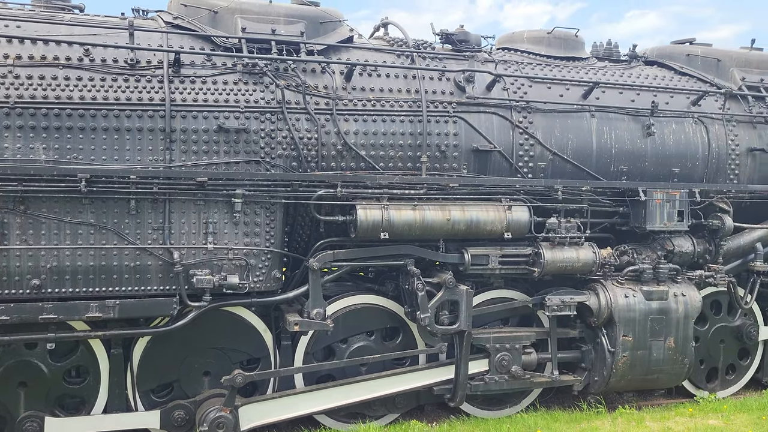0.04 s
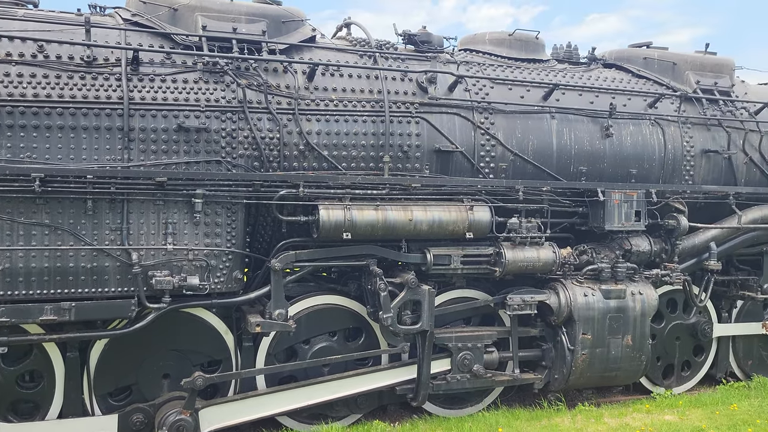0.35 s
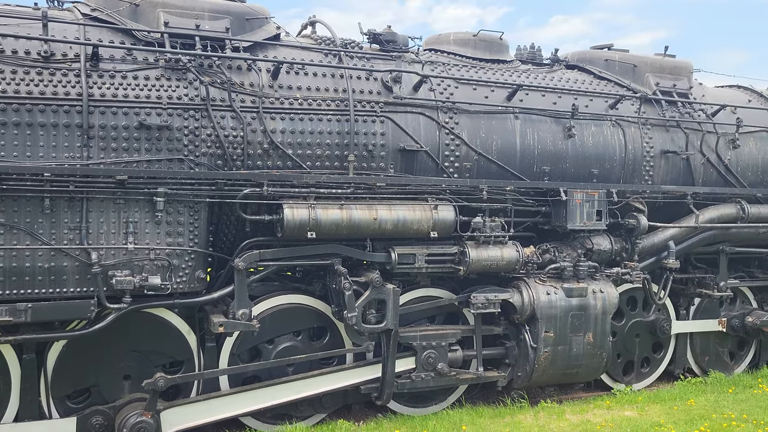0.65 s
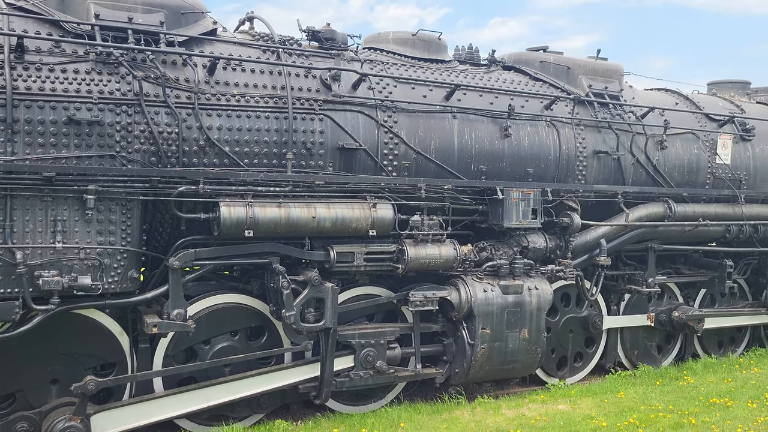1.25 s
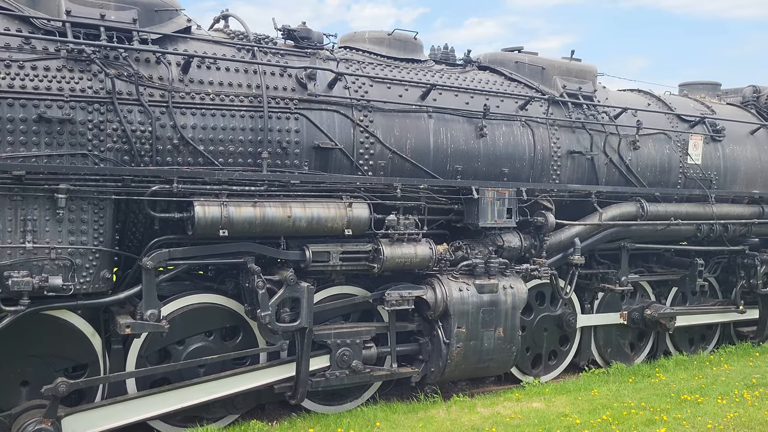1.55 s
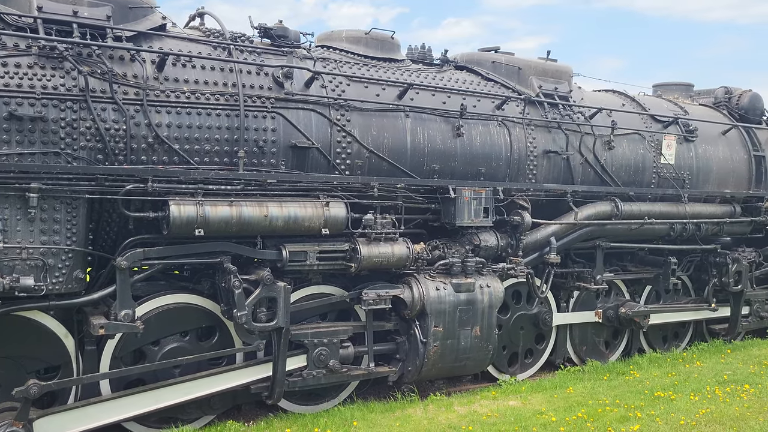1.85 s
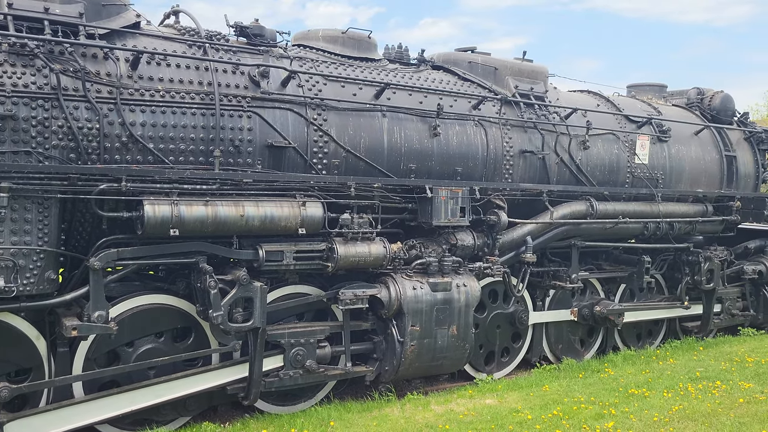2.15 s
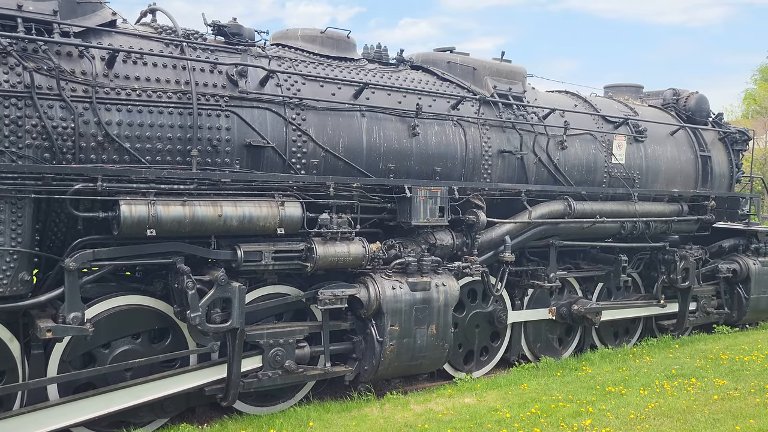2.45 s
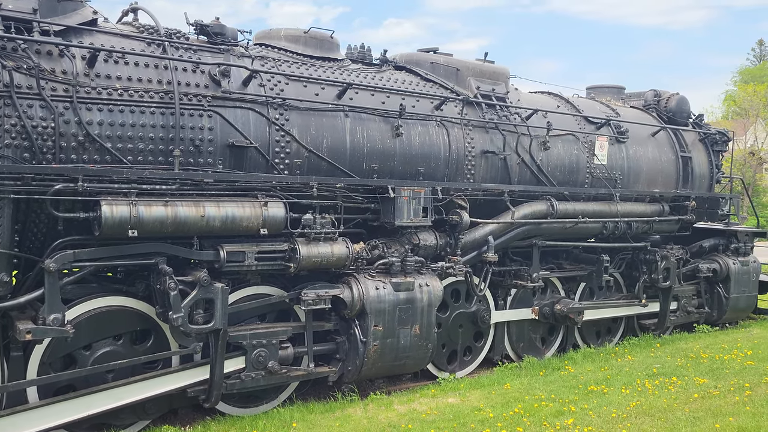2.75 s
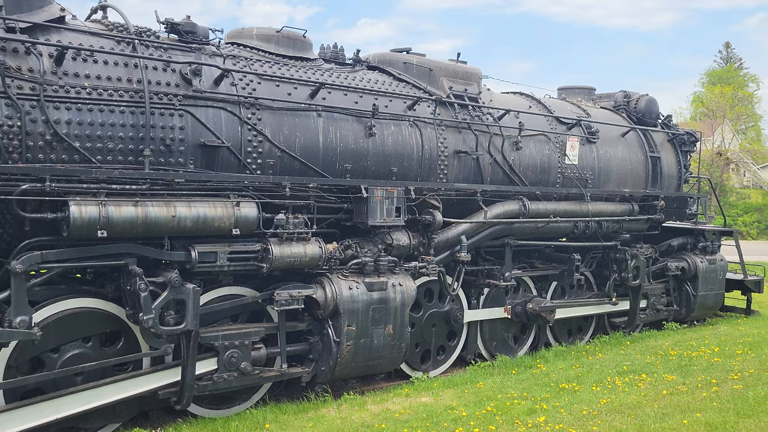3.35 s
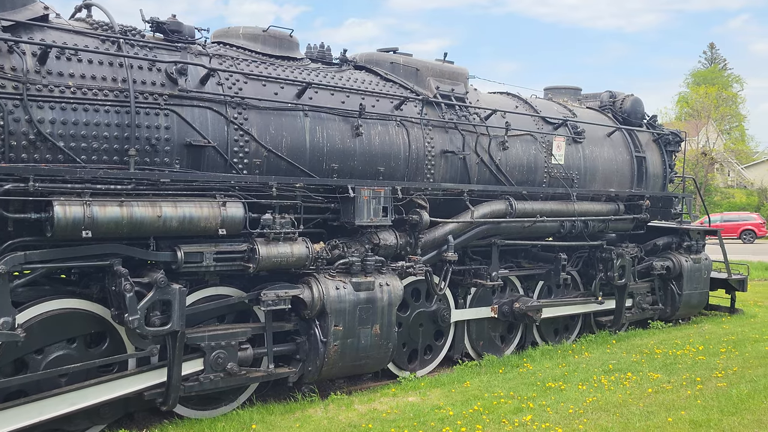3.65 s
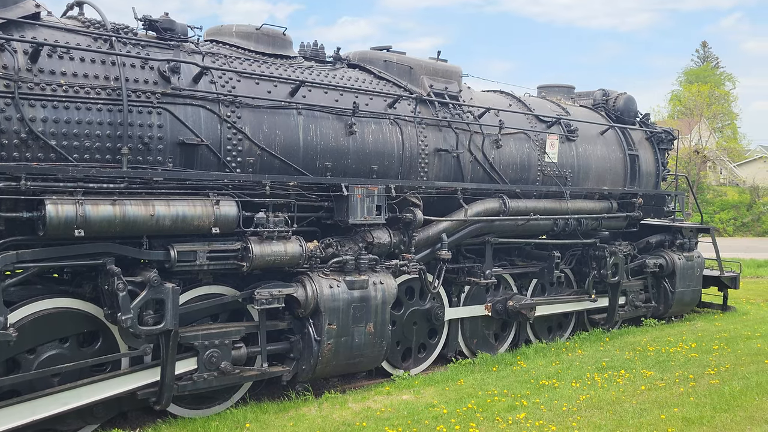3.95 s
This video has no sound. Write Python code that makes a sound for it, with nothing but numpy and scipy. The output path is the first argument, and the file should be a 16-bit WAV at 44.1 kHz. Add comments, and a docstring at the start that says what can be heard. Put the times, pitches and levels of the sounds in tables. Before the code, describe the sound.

Wind thumps on the microphone outdoors as cloth rustles and cracks, slackening after a second. Steady road rumble and a low hum run underneath; later a distant bird chirps and a lighter breeze rumbles on the left.

```python
"""Outdoors beside a parked locomotive: road traffic rumbles under one steady low hum throughout.
At the start a gust buffets the microphone and sets cloth, probably a flag, fluttering and snapping:
creases click, folds rasp, cracks ring briefly. After about a second it settles into soft slack flaps.
From 2 s a small bird chirps far off and a faint leafy sizzle passes; near 3 s a blurred trill joins
and a lighter breeze catches the left microphone port."""
import sys
import numpy as np
from scipy import signal
from scipy.fft import rfft, irfft
from scipy.io import wavfile

SR = 44100
rng = np.random.default_rng(int(sys.argv[2]) if len(sys.argv) > 2 else 0)


def store_wav(level_fs):
    """Save 16-bit WAV to argv[1]."""
    pcm = np.round(np.clip(np.atleast_2d(level_fs), -1, 1) * 32767)
    wavfile.write(sys.argv[1], SR, pcm.T.astype(np.int16))


N = 176400
TIME, HZ = np.arange(N) / SR, np.fft.rfftfreq(N, 1 / SR)
SNAP_RISE_S = .0006
# cloth at the two microphone ports: freq_hz, correlation
CLOTH_CORRELATION = [(200, 0.6), (400, 1), (700, .5), (1250, -0.72), (1750, -0.19), (2400, 0.79),
                     (3200, -0.0056), (4400, -0.15), (8000, 0.49)]


def flag():
    """Cloth rustles with the gust; each whip gives a crease burst, a high crack and a brief ring."""
    # rustle envelope: time_s, level_db, treble_db
    flutter = [(0, -42, 14.5), (.17, -32.5, 7.5), (.27, -34.5, 10.5), (.44, -38, 9), (.53, -36.5, 5),
               (.7, -37, 5), (.85, -31, 0.5), (1.0, -33.5, 1.5), (1.12, -35.5, -4.5), (1.24, -39.5, -3),
               (1.36, -55, -14), (1.6, -44.5, -28.5), (1.85, -46, -24), (2.3, -53.5, 11.5), (4, -51.5, 6)]
    # whips: start_s, level_db, decay_s, treble_db, ring_offset_db
    snaps = [(.002, -31, 0.01, 18.5, -23), (0.028, -43.5, .012, 26, -23), (0.095, -35.5, 0.0046, 14.5, -20),
             (0.236, -28.5, 0.034, 11, -19), (0.318, -30, 0.017, 8, -8), (0.335, -29.5, 0.012, 11, -20),
             (0.413, -29, 0.037, 8, -11), (0.607, -28.5, 0.0064, -12, -27), (0.708, -29, 0.0053, -13, -14),
             (.764, -29, 0.009, 3, -4.5), (0.809, -27, 0.018, 3.5, 0.5), (0.906, -23, 0.0091, 1, -7),
             (1.008, -27, 0.028, 3.5, 1.5), (1.097, -28.5, 0.017, 8, 3), (1.146, -37, 0.0051, -3, 7),
             (1.179, -22, 0.011, -2.5, 0.5), (1.234, -40, 0.005, -4, 5), (1.521, -34, 0.016, -22, -23),
             (1.581, -38, 0.0059, -12, -13), (1.616, -37, 0.016, -20, -2.5), (2.514, -51.5, 0.0054, 2, 8),
             (2.709, -42.5, 0.009, 5, -4.5)]
    # ring modes: pitch_hz, gain_db, decay_s
    modes = [(2820, 1, 0.0038), (3550, -15, 0.015), (2310, -13.5, 0.0043)]
    crack_offset_db, crack_decay_s = -41, .008
    body, treble = cloth(low_cut_hz=61)
    bright = amp(along(flutter, column=2))
    out = (body + treble * bright) * amp(along(flutter) + .86 * drift(rate_hz=32))
    body, treble = cloth(low_cut_hz=465)
    crack = bright * unit(colour(noise(), highpass(hz=4500, order=4)))
    tunings = 1 + .01 * rng.uniform(-.62, 1, len(snaps))
    t = np.arange(SR // 10) / SR
    rise = np.minimum(t / SNAP_RISE_S, 1)
    for (s, db, decay_s, treble_db, ring_db), tuning in zip(snaps, tunings):
        out += amp(db) * burst(s, decay_s) * (body + amp(treble_db) * treble)
        out += amp(db + crack_offset_db + treble_db) * burst(s, crack_decay_s) * crack
        ring = sum(amp(mode_db) * np.exp(-t / fall_s) * np.sin(2 * np.pi * hz * tuning * t)
                   for hz, mode_db, fall_s in modes)
        add(out, s, amp(db + ring_db) * rise * ring * stereo_db(-1.5, 3))
    return out


def cloth(low_cut_hz):
    """Crease noise with a ground echo and resonances that come and go, split into body and treble."""
    # crease spectrum: freq_hz, gain_db
    spectrum = [(100, 11.5), (300, 2), (500, -5), (750, 12.5), (1100, 5.5), (1600, 0), (2100, -3.5),
                (2800, -0.5), (4000, -8), (5500, -14), (7600, -22), (8400, -32), (9500, -59),
                (13000, -39.5), (16000, -71.5)]
    # balance: freq_hz, left_minus_right_db
    pan = [(200, -1), (450, -7), (720, 0), (1100, 6), (1600, 2.5), (2000, 1.5), (2350, -5), (3300, -2),
           (4400, -4.5), (8000, -13), (12000, -4.5)]
    # cloth resonances: centre_hz, width_hz, gain_db
    peaks = [(1765, 330, -1.5), (2210, 53, -3.5), (3000, 120, -6.5), (3700, 110, -11.5)]
    echo_gain, echo_s, peak_waver_db = .2, .001823, 6
    ground = 1 + echo_gain * np.exp(-2j * np.pi * HZ * echo_s)
    clicks = ports(creases(), CLOTH_CORRELATION, pan)
    rustle = colour(clicks, amp(across(spectrum)) * ground * highpass(low_cut_hz, order=2))
    resonance = sum(colour(rustle, bell(hz, width_hz)) * amp(db + peak_waver_db * drift(rate_hz=38))
                    for hz, width_hz, db in peaks)
    rustle = unit(rustle + resonance)
    treble = colour(rustle, highpass(hz=4360, order=4))
    return rustle - treble, treble


def creases(clicks_per_s=4200, spread_db=2.2):
    """Crumpling cloth: dense tiny clicks of uneven size."""
    size = amp(spread_db * np.minimum(rng.exponential(1, (2, N)), 4))
    return size * rng.choice([-1, 1], (2, N)) * (rng.random((2, N)) < clicks_per_s / SR)


def rasps(slips_per_s=450, width_hz=190):
    """Folds stick and slip: uneven pulses through one narrow resonance."""
    # rubs of fold on fold: start_s, length_s, level_db, resonance_hz
    rubs = [(0.234, 0.056, -36.5, 2720), (0.32, 0.091, -38.5, 2600), (0.415, .06, -35.5, 2600),
            (0.574, .18, -43.5, 2960), (.775, 0.13, -37, 2200), (0.95, 0.054, -36.5, 2240),
            (0.926, .13, -41, 1700)]
    out = np.zeros((2, N))
    for s, length_s, db, hz in rubs:
        slip_count = np.floor(np.cumsum(slips_per_s * np.exp(drift(rate_hz=150))) / SR)
        grit = np.diff(slip_count, prepend=0) * noise() * swell(s, length_s)
        rasp = colour(grit, 1 / (1 + 2j * (HZ - hz) / width_hz) ** 2)
        out += amp(db) * unit(rasp) * np.sqrt(length_s * SR / N)  # rms over the rub's length
    return out * stereo_db(-5, 0)


def swish(level_db=-63):
    """Sliding cloth: one airy swell of high crease noise."""
    hiss = unit(colour(creases(), gaussian(hz=12500, width_hz=1500)))
    return amp(level_db) * hiss * swell(start_s=.14, length_s=.16)


def flaps(knock_offset_db=4, knock_decay_s=.006):
    """Slack cloth knocks: a puff of crease noise over a hollow, quickly damped note."""
    # flaps: start_s, level_db, pitch_hz
    hits = [(1.308, -37.5, 680), (1.584, -36.5, 627), (1.694, -34, 653), (1.921, -33, 763),
            (2.116, -37.5, 890), (2.385, -38.5, 770), (2.513, -39.5, 730), (2.582, -38.5, 768),
            (3.159, -48, 780)]
    # puff spectrum: freq_hz, gain_db
    spectrum = [(150, -53), (450, -10.5), (780, 14), (1200, -0.5), (2000, -5), (3500, -7.5), (7500, -37),
                (10000, -51.5)]
    clicks = ports(creases(), CLOTH_CORRELATION, pan=[(500, 2.2), (4000, 1)])
    puff = unit(colour(clicks, amp(across(spectrum))))
    out, t = np.zeros((2, N)), np.arange(SR // 10) / SR
    for s, db, hz in hits:
        out += amp(db) * puff * burst(s, decay_s=.012)
        knock = np.exp(-t / knock_decay_s) * np.sin(2 * np.pi * hz * t)
        add(out, s, amp(db + knock_offset_db) * knock)
    return out


def gust():
    """Wind buffets the microphone and dies away."""
    # gust envelope: time_s, level_db
    envelope = [(0, -21.5), (.035, -19), (.075, -26), (.115, -21.5), (.2, -28.5), (.26, -23.5),
                (.42, -29.5), (.5, -34), (.95, -32.5), (1.25, -37), (1.7, -64.5)]
    # buffet spectrum: freq_hz, gain_db
    spectrum = [(15, -28.5), (30, -5.5), (50, -4.5), (110, 1), (220, -9), (400, -16.5), (750, -19.5),
                (1300, -40), (4000, -36), (9500, -69.5), (13000, -65), (16000, -70.5)]
    # wind at the two ports: freq_hz, correlation
    correlation = [(60, .65), (130, .85), (300, .92), (900, .7)]
    # balance: freq_hz, left_minus_right_db
    pan = [(60, 2.3), (200, 2.4), (600, 4.5)]
    buffet = unit(colour(ports(noise(), correlation, pan), amp(across(spectrum))))
    return buffet * amp(along(envelope) + drift(rate_hz=88))


def thumps(length_s=.04):
    """Single eddies strike the microphone, each a short low push."""
    # eddies: centre_s, peak_db, pitch_hz
    eddies = [(0.042, -15, 61.3), (0.119, -14, 57), (0.265, -20, 189), (0.307, -15.5, 99),
              (0.414, -19.5, 197)]
    out, t = np.zeros(N), np.arange(0, length_s, 1 / SR)
    for (s, db, hz), turn in zip(eddies, rng.random(len(eddies))):
        push = np.hanning(len(t)) * np.sin(2 * np.pi * (hz * t + turn))
        add(out, s - length_s / 2, amp(db) * push)
    return out * stereo_db(1, -1)


def breeze():
    """Lighter wind rumbles mostly on the left port."""
    # breeze envelope: time_s, level_db
    envelope = [(0, -54.5), (2.8, -36), (3.05, -24), (3.25, -31), (3.47, -18.5), (3.7, -34.5), (4, -34)]
    band = bell(hz=63.4, width_hz=42) ** 1.3 * highpass(hz=34, order=6)
    rumble = unit(colour(noise(), band))
    return rumble * amp(along(envelope) + 2 * drift(rate_hz=13)) * stereo_db(0, -12)


def hum(pitch_hz=165.65, level_db=-27.5):
    """One steady, barely wavering machine tone."""
    # slow swell: time_s, offset_db
    envelope = [(0, -2.6), (1.2, -1.9), (2.5, -0.04), (4, -0.5)]
    waver_hz, waver_db, right_lead_rad = .05, .3, .4
    turns = np.cumsum(pitch_hz + waver_hz * drift(rate_hz=3.7)) / SR
    rms = amp(level_db + waver_db * drift(rate_hz=1.7) + along(envelope))
    return np.sqrt(2) * rms * np.sin(2 * np.pi * turns + np.array([[0], [right_lead_rad]]))


def traffic():
    """Lumpy engine rumble and smoother tyre noise from the road."""
    # engine spectrum: freq_hz, gain_db
    engine_spectrum = [(15, -37), (25, -18.5), (33, -13), (48, 2.5), (65, 4), (82, 3.5), (100, -0.5),
                       (140, -4.5), (200, -11.5), (260, -16.5), (400, -32), (900, -65.5)]
    # engine envelope: time_s, level_db
    engine_envelope = [(0, -27), (1.2, -27), (1.6, -29.5), (3.0, -28.5), (3.5, -29.5), (4, -30.5)]
    # tyre spectrum: freq_hz, gain_db
    tyre_spectrum = [(210, -4), (320, 3.5), (400, -2.5), (520, 0), (630, 0), (742, 0), (974, -6.5),
                     (1040, -4), (1380, -7), (2170, -12.5), (2890, -20), (3980, -21.5), (5480, -28),
                     (7920, -32.5), (9440, -78), (14100, -50.5), (16000, -63)]
    # tyre envelope: time_s, level_db
    tyre_envelope = [(0, -43), (1.4, -40.5), (2, -42), (4, -43)]
    # road at the two ports: freq_hz, correlation
    correlation = [(40, .9), (80, .95), (130, .96), (290, .93), (640, .85), (1400, .45), (3000, .3),
                   (7000, .1)]
    # phase between ports: freq_hz, left_lead_rad
    phase = [(60, -.1), (200, -.25), (400, -.4), (780, -.8), (1460, -3), (2150, -6), (3000, -6.4)]
    # balance: freq_hz, left_minus_right_db
    pan = [(60, 1.5), (110, -1), (200, 1), (380, 0), (700, 2), (1290, 2.5), (1900, 1), (2500, -6.5),
           (3300, -1), (4400, -7), (6000, -7), (8120, -8.5), (11000, 0.5)]
    air = ports(noise(), correlation, pan)
    air = colour(air, np.exp(1j * across(phase) * np.array([[.5], [-.5]])))
    engines = unit(colour(air, amp(across(engine_spectrum))))
    engines *= amp(along(engine_envelope) + drift(rate_hz=8))
    tyres = unit(colour(air, amp(across(tyre_spectrum)) * highpass(hz=330, order=4)))
    tyres *= amp(along(tyre_envelope) + .5 * drift(rate_hz=7.2))
    return engines + tyres


def bird():
    """Each chirp is two falling whistles: the upper echoes once, the lower starts later and steeper."""
    # chirps: start_s, level_db, start_pitch_hz
    chirps = [(2.014, -55, 4150), (3.373, -51.5, 4680), (3.503, -50, 4450), (3.641, -51.5, 4380)]
    high_s, fall_hz_per_s, waver_hz = .05, 18000, 90
    low_s, low_lag_s, low_ratio, low_floor_hz, glide_s = .038, .01, .93, 2400, .021
    echo_s, echo_db = .024, -12.5
    out = np.zeros(N)
    t_high, t_low = np.arange(0, high_s, 1 / SR), np.arange(0, low_s, 1 / SR)
    for s, db, hz in chirps:
        high_hz = hz - fall_hz_per_s * t_high + waver_hz * drift(rate_hz=440)[:len(t_high)]
        low_hz = low_floor_hz + (hz * low_ratio - low_floor_hz) * np.exp(-t_low / glide_s)
        high, low = [amp(db) * signal.windows.tukey(len(f), .6) * np.sin(2 * np.pi * np.cumsum(f) / SR)
                     for f in (high_hz, low_hz)]
        add(out, s, high)
        add(out, s + low_lag_s, low)
        add(out, s + echo_s, high * amp(echo_db))
    return out * stereo_db(-1.5, 1.5)


def trees():
    """Two far noise bands: a blurred bird trill and a faint high sizzle, perhaps leaves."""
    # trill envelope: time_s, level_db
    trill_envelope = [(2.85, -78), (3.1, -58), (3.3, -56), (3.45, -52), (3.6, -66), (3.75, -58), (4, -66)]
    # sizzle envelope: time_s, level_db
    leaf_envelope = [(1.9, -78), (2.25, -70), (2.45, -58.5), (2.9, -71), (4, -71)]
    trill = unit(colour(noise(), bell(hz=2770, width_hz=130))) * amp(along(trill_envelope))
    leaves = unit(colour(noise(), gaussian(hz=5250, width_hz=860))) * amp(along(leaf_envelope))
    return (trill + leaves) * stereo_db(-3, 1.5)


def reflections(x, t60_s=.45, taps_per_s=2000, gap_s=.008, low_cut_hz=750):
    """Short sparse echoes off the locomotive's side, thin in the bass."""
    t = np.arange(SR // 2) / SR
    taps = rng.standard_normal((2, len(t))) * (rng.random((2, len(t))) < taps_per_s / SR)
    taps *= (t > gap_s) * amp(-60 * t / t60_s)
    taps = signal.sosfilt(signal.butter(2, low_cut_hz, "highpass", fs=SR, output="sos"), taps)
    taps /= np.linalg.norm(taps, axis=1, keepdims=True)
    return signal.fftconvolve(x, taps, axes=1)[:, :N]


def amp(db):
    """Decibels to gain."""
    return 10 ** (np.asarray(db) / 20)


def stereo_db(left, right):
    """Gain per channel."""
    return amp([[left], [right]])


def unit(x):
    """Scales to rms 1."""
    return x / np.sqrt(np.mean(x ** 2) + 1e-20)


def noise():
    """Two unrelated white noises."""
    return rng.standard_normal((2, N))


def drift(rate_hz):
    """Smooth random movement of rms 1."""
    return unit(colour(rng.standard_normal(N), 1 / (1 + (HZ / rate_hz) ** 4)))


def across(points):
    """Reads a table over log frequency."""
    hz, value = np.transpose(points)
    return np.interp(np.log(HZ + 1), np.log(hz + 1), value)


def along(points, column=1):
    """Reads a table column over time."""
    rows = np.array(points)
    return np.interp(TIME, rows[:, 0], rows[:, column])


def add(mix, start_s, sound):
    """Mixes a sound in."""
    part = mix[..., max(round(start_s * SR), 0):][..., :sound.shape[-1]]
    part += sound[..., :part.shape[-1]]


def burst(start_s, decay_s):
    """Quick rise, exponential fall."""
    out, t = np.zeros(N), np.arange(SR // 5) / SR
    fall = np.exp(-np.maximum(t - SNAP_RISE_S, 0) / decay_s)
    add(out, start_s, np.minimum(t / SNAP_RISE_S, 1) * fall)
    return out


def swell(start_s, length_s):
    """Rounded rise and fall."""
    out = np.zeros(N)
    add(out, start_s, signal.windows.tukey(round(length_s * SR), .5))
    return out


def colour(x, gain):
    """Filters by a gain per frequency."""
    return irfft(rfft(x) * gain, N)


def bell(hz, width_hz):
    """Gain of one resonance."""
    return 1 / (1 + (2 * (HZ - hz) / width_hz) ** 2)


def gaussian(hz, width_hz):
    """Gain of a band, 1/e at width_hz off centre."""
    return np.exp(-((HZ - hz) / width_hz) ** 2)


def highpass(hz, order):
    """Gain of a low cut."""
    return 1 / (1 + (hz / (HZ + 1)) ** order)


def ports(x, correlation, pan):
    """Two unrelated signals to a left-right pair of given correlation and balance."""
    a, b = rfft(x)
    shared, side = np.clip(across(correlation), -.99, .99), amp(across(pan) / 2)
    right = shared * a + np.sqrt(1 - shared ** 2) * b
    return irfft(np.array([a * side, right / side]), N)


def scene():
    """Flag and bird with their echoes, over traffic, hum, wind and trees."""
    flutter, chirps = flag() + rasps() + swish() + flaps(), bird()
    echoes = reflections(amp(-12) * flutter + amp(-3) * chirps)
    return flutter + chirps + echoes + traffic() + hum() + gust() + breeze() + thumps() + trees()


def record(dry):
    """Steep low-pass at 15.9 kHz."""
    return signal.sosfilt(signal.butter(24, 15900, fs=SR, output="sos"), dry)


dry = scene()
out = record(dry)
store_wav(out)
```